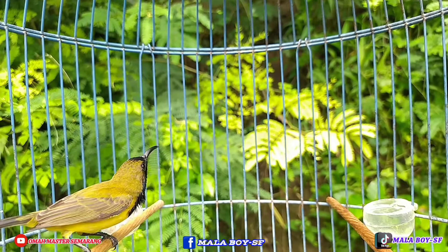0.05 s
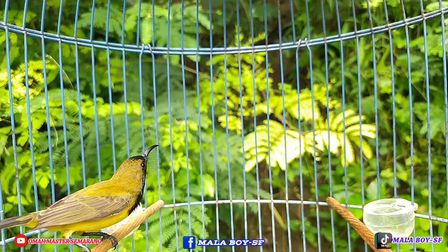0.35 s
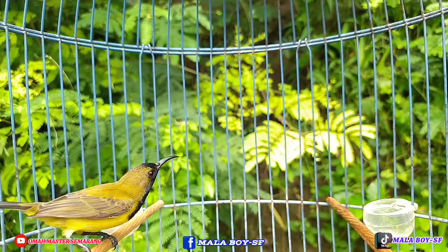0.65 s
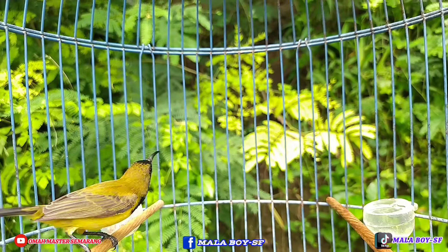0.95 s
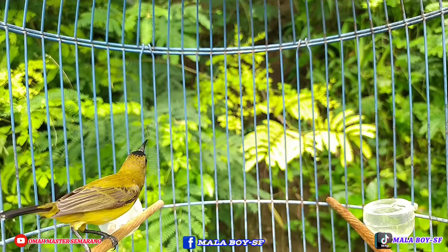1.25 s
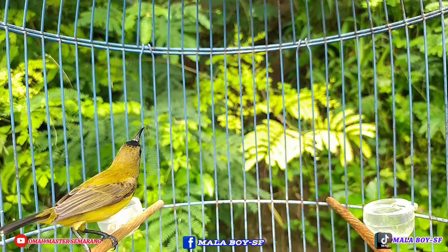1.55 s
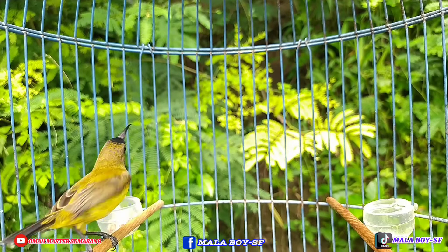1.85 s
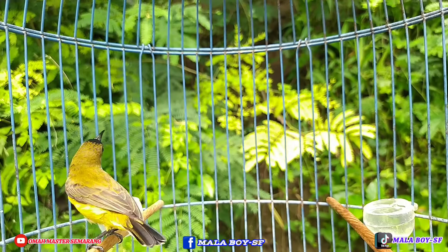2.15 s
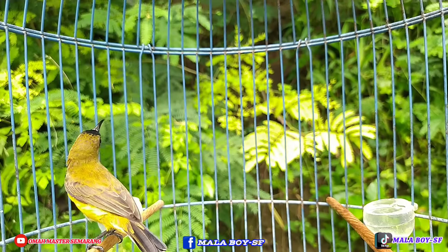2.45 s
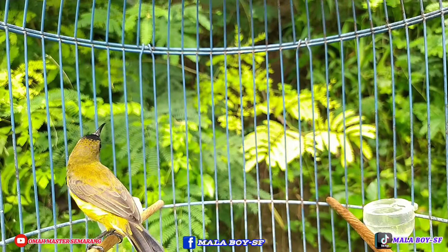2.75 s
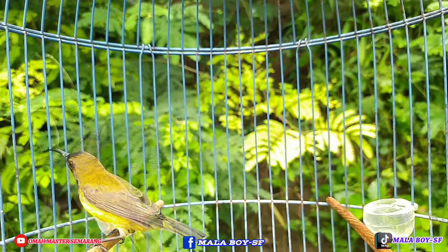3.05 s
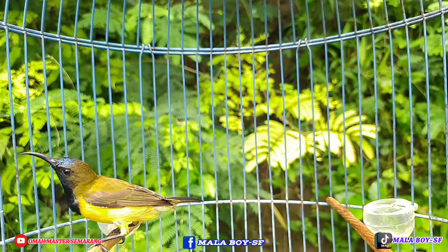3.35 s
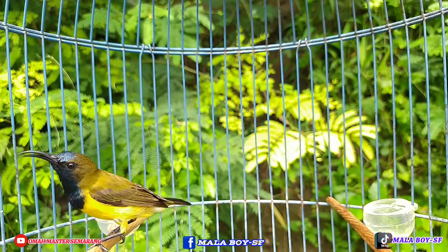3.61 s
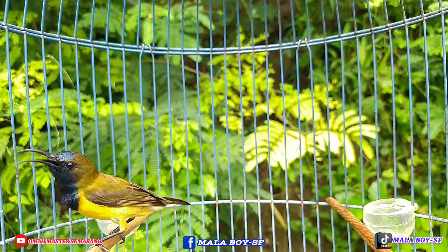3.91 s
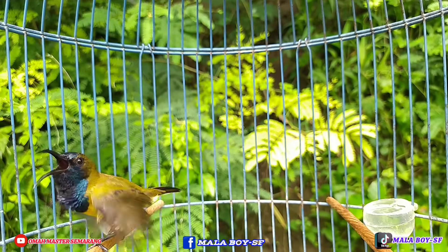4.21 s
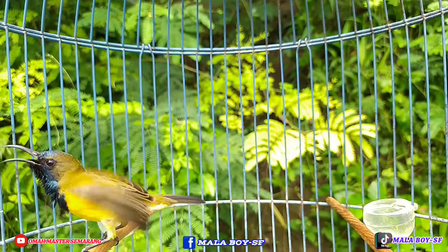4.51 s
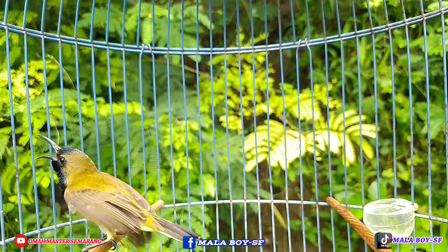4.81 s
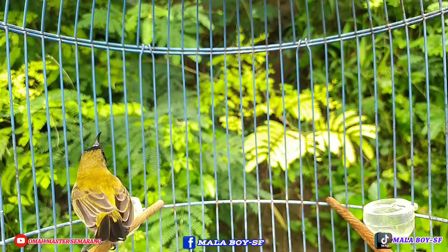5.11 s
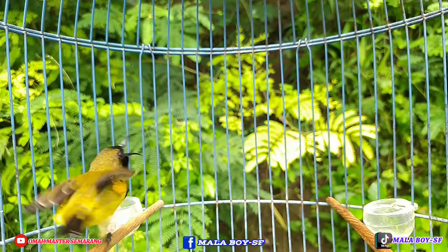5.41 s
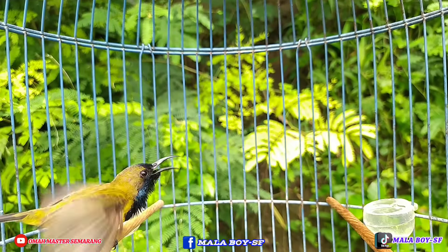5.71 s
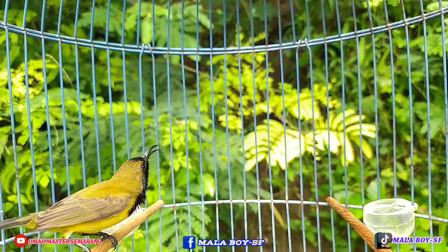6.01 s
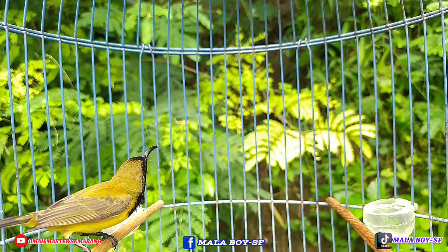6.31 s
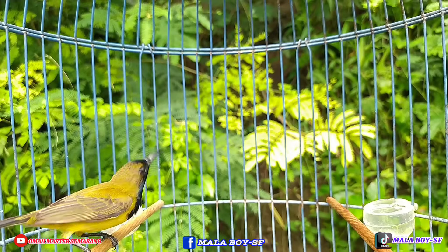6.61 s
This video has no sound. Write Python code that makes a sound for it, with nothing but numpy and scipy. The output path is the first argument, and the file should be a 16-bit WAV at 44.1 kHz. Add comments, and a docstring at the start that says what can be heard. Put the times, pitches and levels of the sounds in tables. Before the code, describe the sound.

A small songbird close to the microphone makes a few soft ticks, then two loud, piercing chips and a rapid trill lasting about two seconds, slightly distorted, its wings pushing soft puffs of air. Another bird whistles faintly far off at the start and the end. Behind them is steady outdoor hiss and a low traffic rumble, with one distant engine passing before the chips.

```python
"""In a garden, a caged sunbird gives a few soft ticks, two sharp chips and a fast trill of arched notes.
Its voice is a sweeping harmonic tone filtered by the throat, so close that it overloads the microphone;
nearby surfaces echo it, and its wings flutter during the trill. Another bird whistles faintly far off.
Underneath lies a bed of hiss and distant traffic, with one engine passing."""
import sys
import numpy as np
from scipy import signal
from scipy.fft import rfft, irfft, next_fast_len
from scipy.io import wavfile
from scipy.ndimage import uniform_filter1d

SR = 44100
rng = np.random.default_rng(int(sys.argv[2]) if len(sys.argv) > 2 else 0)


def generate_wav(signal):
    """Clip the signal to [-1, 1] and save it as 16-bit WAV at the path in sys.argv[1]."""
    frames = np.transpose(np.atleast_2d(signal))
    scaled = np.clip(frames, -1, 1) * 32767
    pcm = np.round(scaled).astype(np.int16)
    wavfile.write(sys.argv[1], SR, pcm)


N = 293706
TIME = np.arange(N) / SR


def from_db(db):
    """Decibels to gain."""
    return 10 ** (np.asarray(db) / 20)


def unit_rms(x):
    """Scale to unit power."""
    return x / np.sqrt(np.mean(x ** 2) + 1e-20)


def along(rows, at):
    """Read a table's other columns as automation curves over its first."""
    first, *columns = np.transpose(rows)
    return [np.interp(at, first, column) for column in columns]


def at_hz(points, hz):
    """Read a curve on a log-frequency axis."""
    f, value = np.transpose(points)
    return np.interp(np.log(np.maximum(hz, 1)), np.log(f), value)


def equalise(x, curve):
    """Shape a sound by an EQ curve of f/Hz, gain/dB."""
    size = next_fast_len(2 * x.shape[-1])
    hz = np.arange(size // 2 + 1) * SR / size
    return irfft(rfft(x, size) * from_db(at_hz(curve, hz)), size)[..., :x.shape[-1]]


def drift(size, rate):
    """Random modulation that glides to a new value rate times a second."""
    steps = np.arange(size) * rate / SR
    count = int(steps[-1]) + 2
    return np.interp(steps, np.arange(count), rng.standard_normal(count))


def add(out, start, sound):
    """Mix a sound in at a time in seconds."""
    i = int(start * SR)
    out[i:i + len(sound)] += sound[:max(N - i, 0)]


# stereo image of the noise beds: f/Hz, left-right correlation
CORRELATION = [(30, 0.61), (150, 0.96), (300, 0.86), (600, 0.55), (1200, -0.22), (2500, 0.05),
               (5000, -0.12), (10000, 0.027)]
def stereo_noise(spectrum):
    """Coloured noise, narrow in the bass and wide in the treble."""
    size = next_fast_len(N)
    hz = np.arange(size // 2 + 1) * SR / size
    mid, side = rfft(rng.standard_normal((2, size))) * from_db(at_hz(spectrum, hz))
    alike = np.clip(at_hz(CORRELATION, hz), -1, 1)
    left_right = np.sqrt(1 + alike) * mid + np.sqrt(1 - alike) * side * [[1], [-1]]
    return unit_rms(irfft(left_right, size)[:, :N])


# tone of the traffic and of the garden air: f/Hz, relative level/dB
TRAFFIC_EQ = [(12, -42), (20, -7), (76, -8.5), (157, -2), (238, -5.5), (275, -8), (312, -7), (409, -7.5),
              (526, -12), (742, -12), (1050, -12), (1300, -18), (1500, -35), (1950, -49), (3300, -120)]
AIR_EQ = [(880, -10.5), (1500, -1), (1730, -1.5), (2200, -2), (3520, -7), (4480, -6.5), (6370, -5.5),
          (6930, -7), (9130, 0), (10000, -4.5), (11100, -14.5), (14400, -23.5), (22000, -120)]
# fader rides on the bed: t/s, rumble level/dB, hiss level/dB (both before trim)
BED_FADERS = [(0, -37.5, -42.5), (2.75, -37, -42.5), (2.97, -41.5, -46), (3.28, -37, -42.5),
              (6.66, -38, -42)]
def traffic_and_air(rumble_trim_db=1.0, hiss_trim_db=4.5, waver_db=0.47):
    """Distant traffic wavers under an airy hiss; both dip briefly near 3 s."""
    rumble_db, hiss_db = along(BED_FADERS, TIME)
    rumble = from_db(rumble_trim_db + rumble_db + waver_db * drift(N, 8)) * stereo_noise(TRAFFIC_EQ)
    return rumble + from_db(hiss_trim_db + hiss_db) * stereo_noise(AIR_EQ)


def whistle(length, from_hz, to_hz, level_db, waver=0.015):
    """A thin, unsteady whistle that glides and levels off."""
    size = int(length * SR)
    glide = np.sin(np.linspace(0, np.pi / 2, size))
    pitch = (from_hz + (to_hz - from_hz) * glide) * (1 + waver * drift(size, 498))
    return from_db(level_db) * np.sin(2 * np.pi * np.cumsum(pitch) / SR) * signal.windows.tukey(size, .4)


# rising whistles: t/s after the cue, length/s, start f/Hz, end f/Hz, relative level/dB
UPSLURS = [(0, 0.086, 4500, 5410, -50), (0.182, .042, 4350, 4910, -47), (0.351, .086, 4100, 4830, -50),
           (.533, 0.083, 4100, 4610, -51.5), (0.7, 0.064, 4060, 4730, -48.5), (0.91, .06, 4150, 4650, -53)]
# cues for the rising whistles: t/s
UPSLUR_CUES = [.047, 6.195]
# falling whistle: length/s, start f/Hz, end f/Hz, relative level/dB
DOWNSLUR = (.1, 5200, 5000, -49)
def far_bird(downslur_s=3.7):
    """Faint rising whistles are heard at the start and near the end, one falling after the first chip."""
    out = np.zeros(N)
    for cue in UPSLUR_CUES:
        for after_s, *note in UPSLURS:
            add(out, cue + after_s, whistle(*note))
    add(out, downslur_s, whistle(*DOWNSLUR))
    return out


# tone of the reverb: f/Hz, gain/dB
REVERB_EQ = [(3000, 5), (5000, -2.5), (5600, 1), (6100, 5), (6900, -1), (10000, -2), (13000, 6)]
def garden_reverb(x, t60, build_s=0.0046, treble_hz=7500, treble_t60=.25):
    """Leaves and walls scatter a wide, diffuse tail; its treble has its own decay time."""
    t = np.arange(int(.8 * SR)) / SR
    noise = rng.standard_normal((2, len(t))) * (1 - np.exp(-t / build_s))
    low = signal.sosfiltfilt(signal.butter(4, treble_hz, fs=SR, output="sos"), noise)
    tail = low * from_db(-60 * t / t60) + (noise - low) * from_db(-60 * t / treble_t60)
    tail /= np.sqrt((tail ** 2).sum(axis=1, keepdims=True))
    return signal.fftconvolve(x[None], equalise(tail, REVERB_EQ), axes=1)[:, :N]


# turbulence in the syrinx, and resonance of the throat and open beak: f/Hz, gain/dB
TURBULENCE_EQ = [(2000, -12), (3600, 5), (5000, -4), (12000, 3)]
THROAT_EQ = [(1200, -35), (1900, -22), (2800, -21.5), (3250, -22.5), (3700, -12.5), (4400, -16.5),
             (5200, -5.5), (6100, -1.5), (6700, -2), (7500, -3.5), (8300, -3.5), (9300, -1), (10400, -5.5),
             (11500, -16.5), (16000, -19)]
def breath(size):
    """Turbulent air coloured by the throat."""
    turbulence = equalise(rng.standard_normal(size), TURBULENCE_EQ)
    return unit_rms(equalise(turbulence, THROAT_EQ))


# raw tone of the syrinx: harmonic number, relative level/dB
PARTIALS = [(1, 1.5), (2, 2), (3, 2.5), (4, -2.5), (5, -7), (6, -3), (7, -19)]
def syrinx(pitch, level_db, pure_db=-28, rasp_db=-11, air_db=-33):
    """Harmonics sweep through the throat: raspy when the membrane is slack, nearly pure when taut."""
    slack_hz, taut_hz, taut_knee_hz = 1800, 2810, 65
    throat_hz, throat_width_hz = 6420, 2890
    size = len(pitch)
    slack = 1 / (1 + (pitch / slack_hz) ** 10)
    taut = 1 / (1 + np.exp(np.clip((taut_hz - pitch) / taut_knee_hz, -20, 20)))
    jitter = (0.0025 + 0.054 * slack) * drift(size, 1504)
    phase = 2 * np.pi * np.cumsum(pitch * (1 + jitter)) / SR
    tone = np.zeros(size)
    for k, partial_db in PARTIALS:
        # a taut note loses the harmonics above the throat band
        off_band = np.clip((k * pitch - throat_hz) / throat_width_hz, -.3, 1) ** 2
        gain_db = partial_db + at_hz(THROAT_EQ, k * pitch) + pure_db * taut * off_band
        tone += from_db(gain_db) * np.sin(k * phase) * (k * pitch < SR / 2)
    air = (from_db(rasp_db) * slack + from_db(air_db)) * breath(size)
    return from_db(level_db) * (tone + air)


# soft ticks: t/s, length/s, f/Hz, relative level/dB
TICK_CUES = [(0.452, 0.046, 6700, -34), (1.974, 0.019, 5900, -27.5), (1.987, 0.019, 6180, -24.5),
             (6.596, 0.051, 6620, -36)]
def ticks(waver=0.08):
    """Tiny notes from the syrinx, made scratchy by an unsteady pitch."""
    out = np.zeros(N)
    for start, length, pitch_hz, level_db in TICK_CUES:
        size = int(length * SR)
        pitch = pitch_hz * (1 + waver * drift(size, 1740))
        add(out, start, syrinx(pitch, level_db) * signal.windows.tukey(size, .4))
    return out


def delayed(x, ms):
    """A variable delay line in whole samples."""
    return np.interp(np.arange(N) - np.round(ms * SR / 1000), np.arange(N), x)


# panning as the bird moves on its perch: t/s, left lag/ms, left-over-right level/dB
PERCH_PAN = [(2.0, 0.097, 10), (3.55, .28, -11.5), (4.0, 0.28, -10.5), (4.28, .28, -0.5), (4.65, .29, -3.5),
             (4.95, .26, -6), (5.42, .21, 0.5), (5.6, .19, -1.5)]
# early reflections, a left list and a right list: delay/ms, level/dB
REFLECTIONS = [
    [(1.3, -11.5), (2.9, -20.5), (4.6, -23), (7.1, -18.5), (10.5, -15.5)],
    [(1.0, -5), (2.4, -12.5), (5.2, -24), (7.8, -22), (11.6, -15.5)],
]
def near_paths(voice, sway_ms=.1):
    """Direct sound and near echoes, whose paths shift as the bird moves."""
    lag_ms, pan_db = along(PERCH_PAN, TIME)
    direct = np.array([delayed(voice, lag_ms), voice]) * from_db(pan_db * np.array([[.5], [-.5]]))
    echoes = [sum(from_db(db) * delayed(voice, ms + sway_ms * drift(N, 3)) for ms, db in side)
              for side in REFLECTIONS]
    return direct + np.array(echoes)


# engine revs: t/s, cycle f/Hz
REVS = [(1.1, 23.4), (1.6, 24.6), (2.05, 26.09), (3.1, 25.3)]
# engine hum: multiple of the cycle rate, relative level/dB
HUM_ORDERS = [(4, -6), (5, -1.5), (6, 2), (7, -4), (8, -8), (10, -11), (11, -6)]
def passing_engine(nearest_s=2.12, fall_6db_s=0.74, level_db=-41, waver_db=2.0):
    """A distant pass-by: low engine orders swell and fade, each wavering on the way."""
    cycle_hz, = along(REVS, TIME)
    phase = 2 * np.pi * np.cumsum(cycle_hz) / SR
    nearness = 1 / (1 + ((TIME - nearest_s) / fall_6db_s) ** 4)
    hum = np.zeros(N)
    for order, order_db in HUM_ORDERS:
        gain = from_db(level_db + order_db + waver_db * drift(N, 3.82))
        hum += gain * np.sin(order * phase + rng.uniform(0, 2 * np.pi))
    return nearness * hum


def click(size=80):
    """The syrinx snaps open."""
    return breath(size) * np.hanning(size)


SLACK_END_HZ = 1474   # chips and trill notes fall towards this pitch
# sharp chips: t/s, hold/s, held f/Hz, relative level/dB
CHIP_CUES = [(3.549, .0305, 5810, 3.5), (3.993, .0305, 5670, 4)]
def chips(click_db=-18, air_db=-27):
    """A click and a rush of air; the pitch flicks up, holds high, then drops as the membrane lets go."""
    flick_hz, flick_at_s, flick_width_s = 1447, .0015, .0042
    sag_hz_per_s, drop_hz_per_s, drop_s = 5000, 610000, 0.0092
    lead_s, lead_db, attack_s, fade_db = .0105, -27, .002, -20.5
    out = np.zeros(N)
    for start, held_s, held_hz, level_db in CHIP_CUES:
        t = np.arange(-lead_s, held_s + drop_s, 1 / SR)
        release_s = np.maximum(t - held_s, 0)
        flick = flick_hz * np.exp(-((t - flick_at_s) / flick_width_s) ** 2)
        sag = sag_hz_per_s * (t - held_s / 2)
        pitch = np.maximum(held_hz + flick - sag - drop_hz_per_s * release_s, SLACK_END_HZ)
        envelope_db = lead_db * np.clip(.5 - t / attack_s, 0, 1) + fade_db * release_s / drop_s
        air = from_db(air_db) * breath(len(t))
        note = syrinx(pitch, level_db + envelope_db, pure_db=-12.5)
        add(out, start - lead_s, (note + air) * signal.windows.tukey(len(t), .04))
        add(out, start - lead_s, from_db(click_db) * click())
    return out


# bouts of fluttering: start t/s, peak t/s, end t/s, relative level/dB
WING_BOUTS = [(4.0, 4.273, 5.2, -27.5), (5.42, 5.65, 6.08, -37)]
def wings(beat_db=5.5, pan_db=-6, edge_s=.04, swell_db_per_s=19, fade_db_per_s=23):
    """Wing beats, one to each trill note, push lumpy puffs of air at the microphone."""
    puff_eq = [(5, -7), (11, 20), (30, 12), (70, -9), (150, -35), (500, -48), (2000, -92)]  # f/Hz, gain/dB
    puffs = stereo_noise(puff_eq)
    note_starts = [note[0] for note in TRILL_NOTES]
    beats = np.cos(2 * np.pi * np.interp(TIME, note_starts, np.arange(len(note_starts))))
    effort = np.zeros(N)
    for start, peak, end, level_db in WING_BOUTS:
        below_db = np.maximum(swell_db_per_s * (peak - TIME), fade_db_per_s * (TIME - peak))
        gate = np.clip(np.minimum(TIME - start, end - TIME) / edge_s, 0, 1)
        effort += from_db(level_db - below_db) * gate
    return puffs * effort * from_db(-beat_db * beats + pan_db * np.array([[.5], [-.5]]))


# pitch breakpoints (start, rise, shoulder, crest, sink, end): share of the note's length
ARCH_POINTS = [0, .25, .45, .65, .82, 1]
def arch(shoulder_hz, crest_hz, stage, start_hz=1299, rise_hz=2402, sink_share=.853):
    """The pitch starts slack, climbs to a rounded crest and ends slack."""
    pitches = np.array([start_hz, rise_hz, shoulder_hz, crest_hz, sink_share * crest_hz, SLACK_END_HZ])
    top = pitches.max()
    return top - np.interp(stage, ARCH_POINTS, np.sqrt(top - pitches)) ** 2


# trill notes: t/s, length/s, shoulder f/Hz, crest f/Hz
TRILL_NOTES = [(4.08, 0.052, 3205, 3365), (4.172, .053, 2690, 3184), (4.263, .049, 2772, 3236),
               (4.338, 0.043, 3027, 3280), (4.418, .046, 3070, 3260), (4.5, 0.042, 3114, 3250),
               (4.578, 0.048, 3083, 3223), (4.663, 0.044, 3170, 3206), (4.745, .042, 3020, 3173),
               (4.828, .045, 2913, 3100), (4.916, 0.045, 3085, 3170), (5.001, 0.045, 3076, 3204),
               (5.093, .048, 2900, 3126), (5.187, .054, 2698, 3110), (5.302, .055, 2650, 3005),
               (5.414, .056, 2770, 3080), (5.506, .042, 3040, 3240), (5.596, .048, 3033, 3200),
               (5.68, 0.042, 3000, 3180), (5.762, .046, 3013, 3110), (5.851, 0.051, 2836, 3070),
               (5.955, 0.052, 2710, 3060)]
# air pressure envelope of a note: share of its length, relative level/dB
PRESSURE = [(-.1, -25.5), (.02, -8.5), (0.16, 0.5), (.4, 4), (.58, 2.5), (.72, 1), (.82, 1.5), (.95, -6),
            (1.05, -23)]
def trill(smooth_s=.003, trim_db=-0.38, click_db=-23, click_lead_s=0.01):
    """Each note is a tiny opening click, then an arch of pitch on one push of air."""
    out = np.zeros(N)
    for start, length, shoulder_hz, crest_hz in TRILL_NOTES:
        stage = np.arange(PRESSURE[0][0], PRESSURE[-1][0], 1 / (length * SR))
        pitch = uniform_filter1d(arch(shoulder_hz, crest_hz, stage), int(smooth_s * SR))
        envelope_db, = along(PRESSURE, stage)
        add(out, start + stage[0] * length, syrinx(pitch, trim_db + envelope_db))
        add(out, start - click_lead_s, from_db(click_db) * click())
    return out


def scene(voice_send_db=-24, tick_send_db=-7, far_dry_db=1, far_send_db=7.0):
    """The mix: the sunbird up front, its ticks wetter, the far bird deep in reverb, the bed below."""
    soft_ticks = ticks()
    voice = trill() + chips() + soft_ticks
    sunbird = near_paths(voice) + from_db(voice_send_db) * garden_reverb(voice, t60=.5)
    tick_tail = from_db(tick_send_db) * garden_reverb(soft_ticks, t60=.25)
    whistles = far_bird()
    far = from_db(far_dry_db) * whistles + from_db(far_send_db) * garden_reverb(whistles, t60=.5)
    return sunbird + tick_tail + far + traffic_and_air() + passing_engine() + wings()


def record(dry, ceiling=0.97, cutoff_hz=17000):
    """Loud notes overload the input: an oversampled hard clip, then a steep low-pass."""
    clipped = np.clip(signal.resample_poly(dry, 4, 1, axis=1), -ceiling, ceiling)
    sound = signal.resample_poly(clipped, 1, 4, axis=1)
    return signal.sosfilt(signal.cheby2(14, 60, cutoff_hz, fs=SR, output="sos"), sound)


dry = scene()
out = record(dry)
generate_wav(out)
```